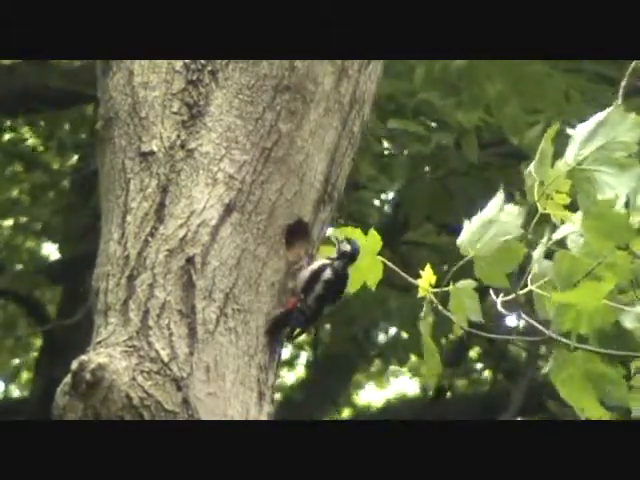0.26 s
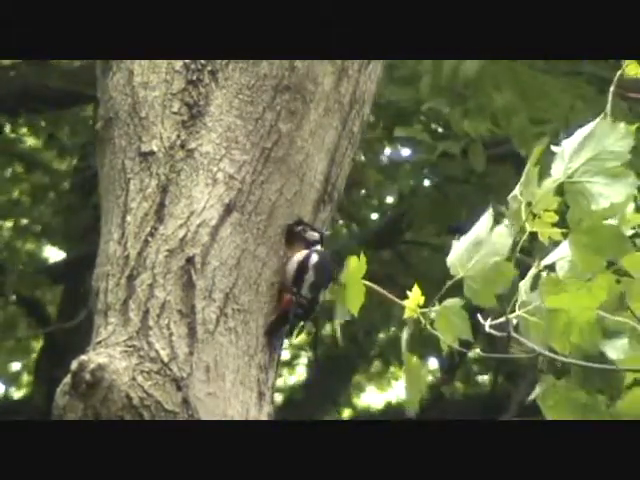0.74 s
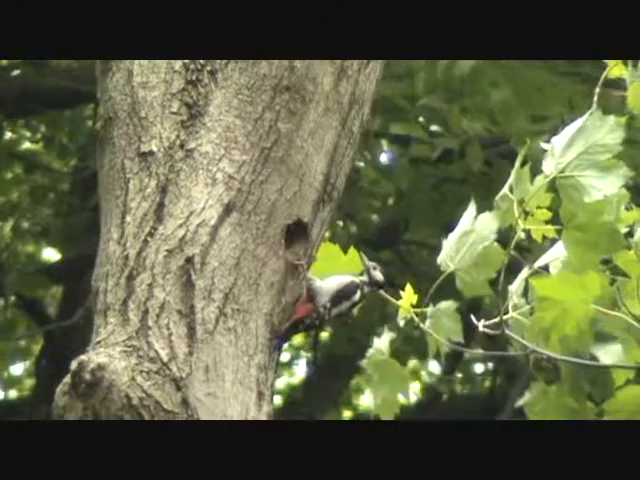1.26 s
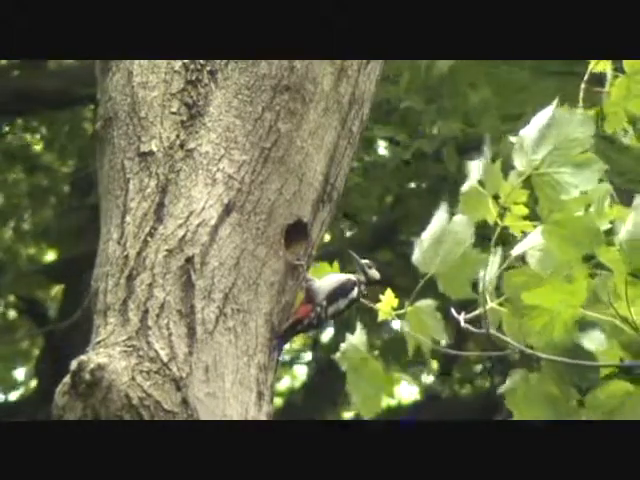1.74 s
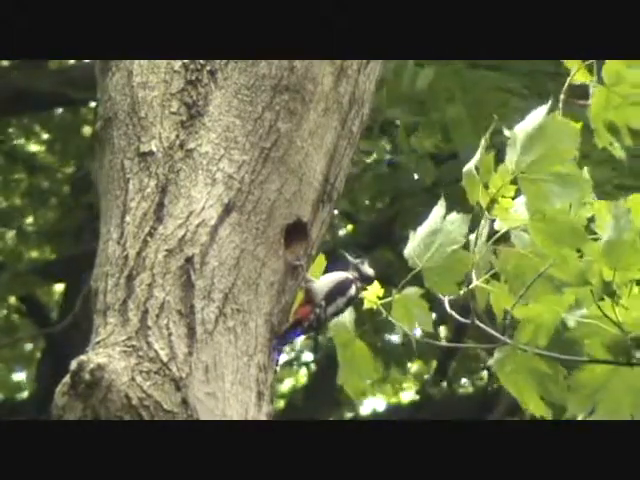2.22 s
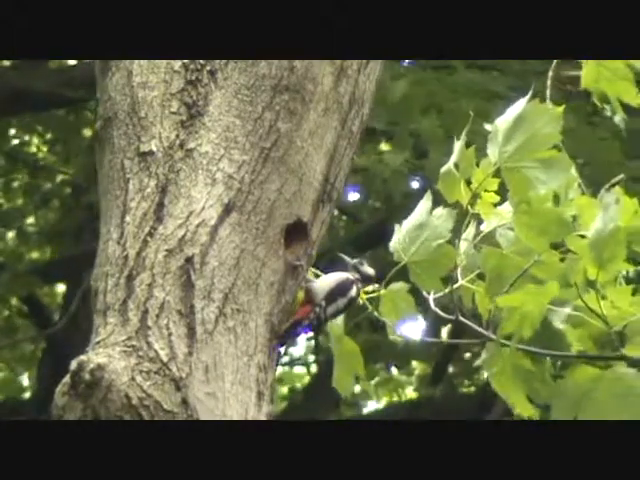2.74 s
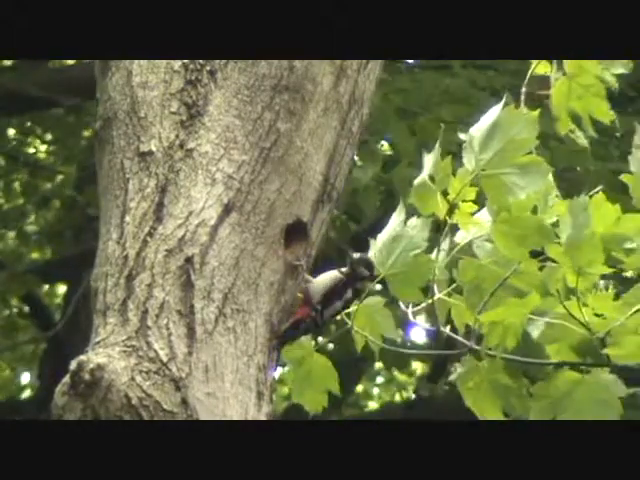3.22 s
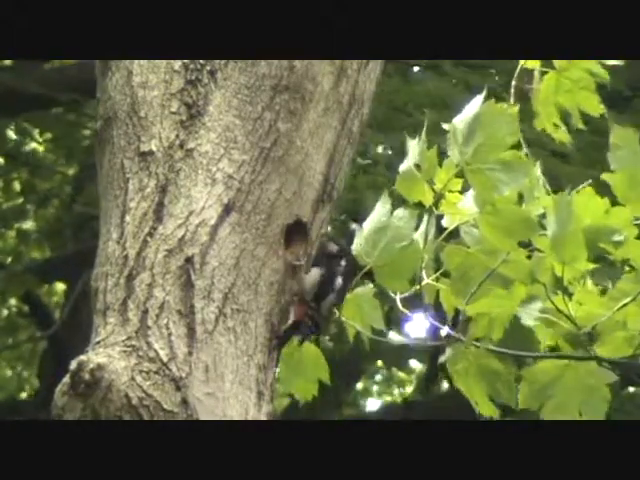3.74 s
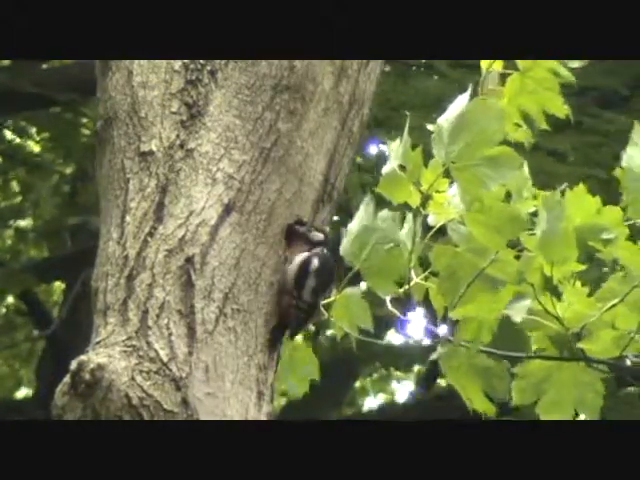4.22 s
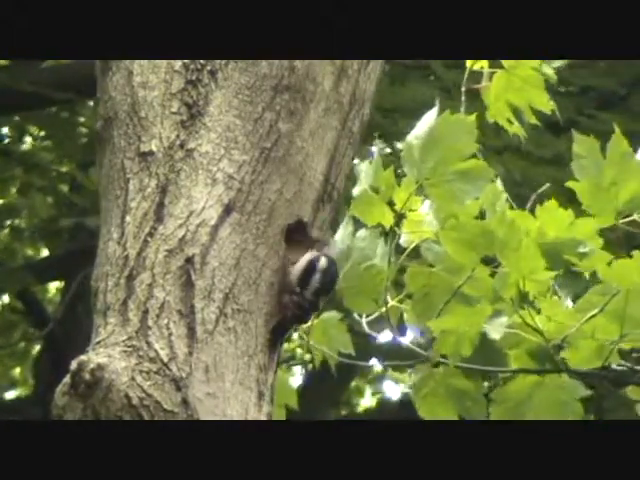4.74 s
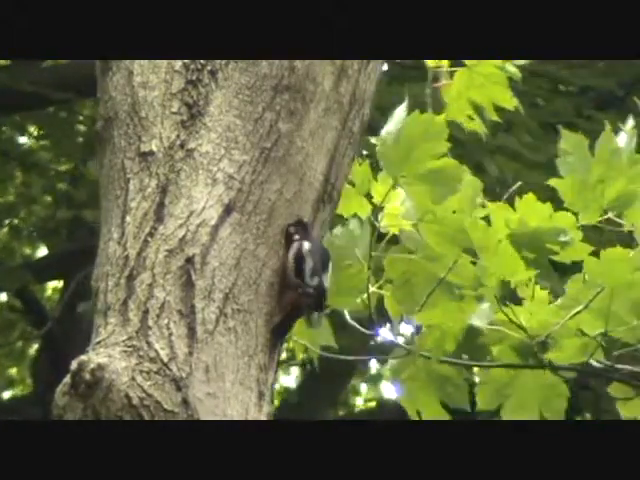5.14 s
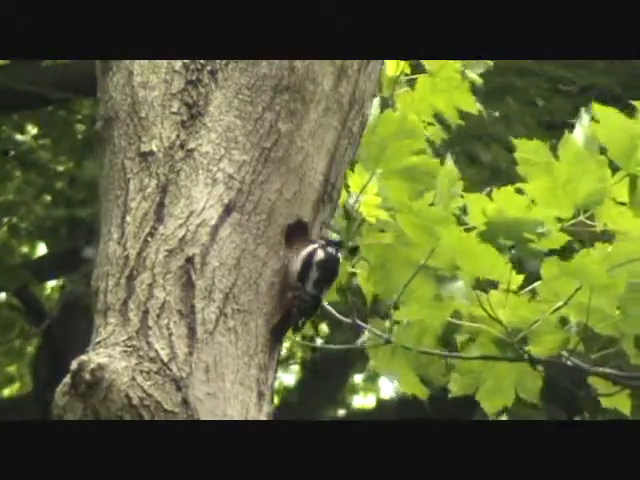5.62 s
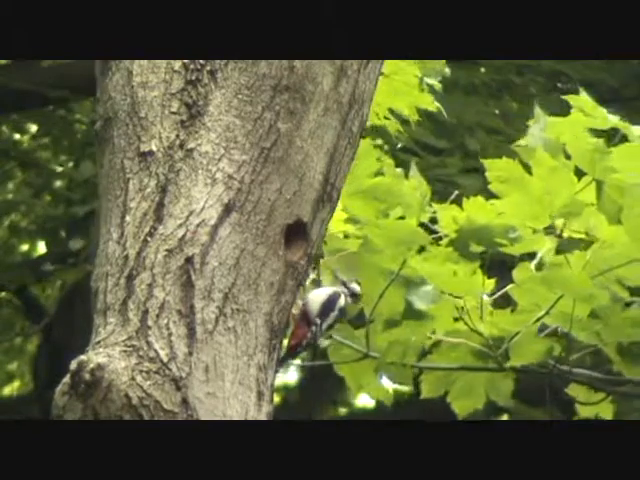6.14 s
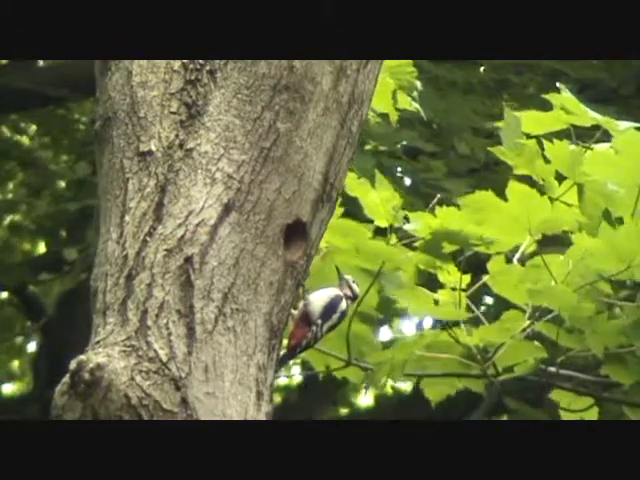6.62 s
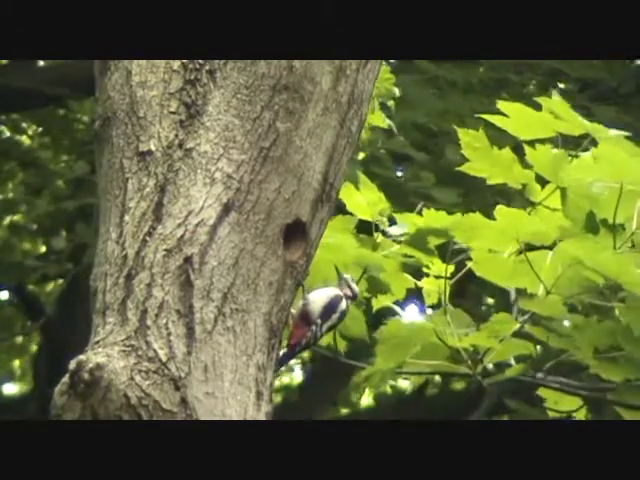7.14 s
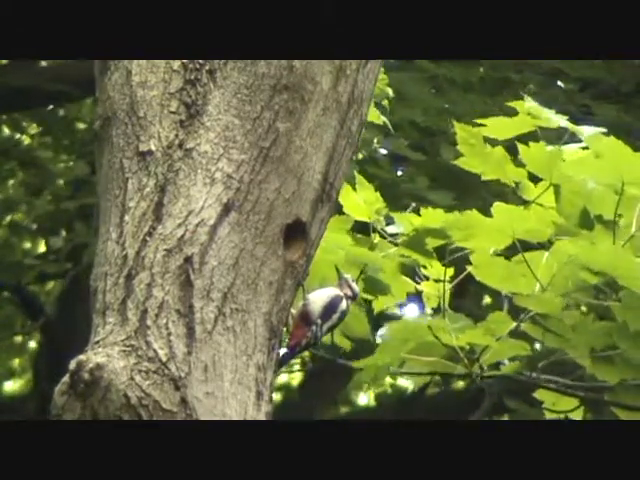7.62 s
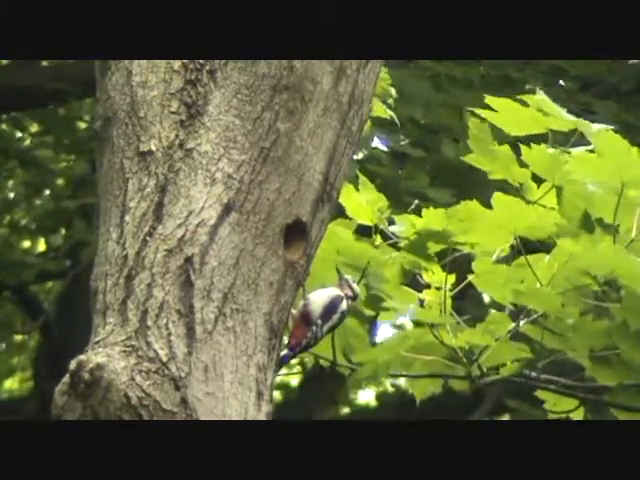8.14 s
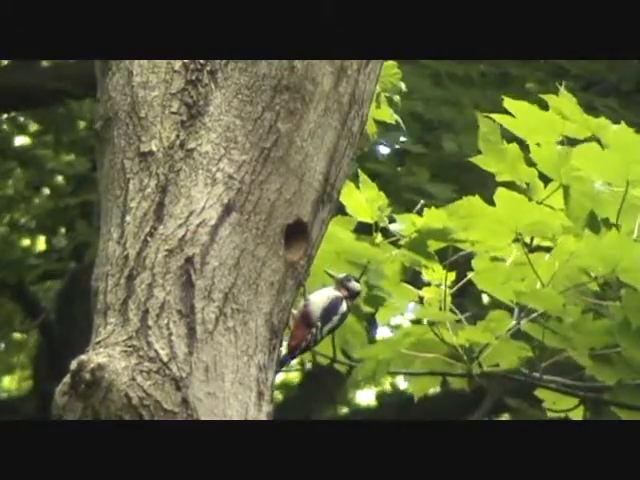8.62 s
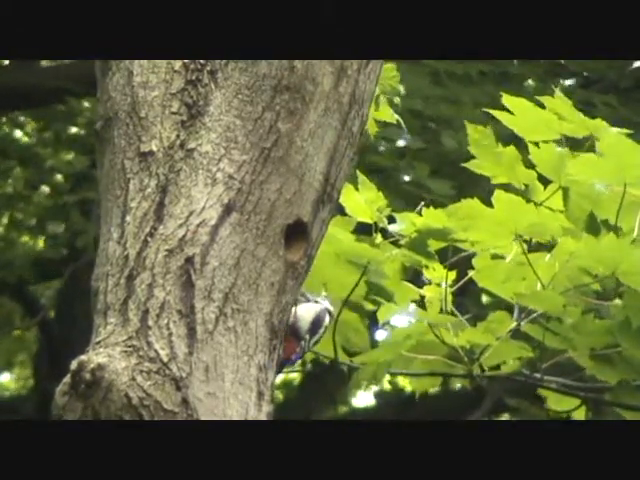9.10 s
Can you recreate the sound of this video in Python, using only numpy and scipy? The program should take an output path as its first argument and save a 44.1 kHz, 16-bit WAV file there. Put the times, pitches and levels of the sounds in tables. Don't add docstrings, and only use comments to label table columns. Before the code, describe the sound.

In leafy woodland, a rapid woodpecker chatter dies away, small birds chip and whistle, then two crisp lone calls ring out above low wind.

```python
import sys
import numpy as np
from scipy import signal
from scipy.fft import rfft, irfft, next_fast_len
from scipy.io import wavfile
from scipy.ndimage import uniform_filter1d

SR = 44100
rng = np.random.default_rng(int(sys.argv[2]) if len(sys.argv) > 2 else 0)


def transcribe(u):
    v = np.clip(np.atleast_2d(u).T, -1, 1)
    q = np.round(v * 32767).astype(np.int16)
    wavfile.write(sys.argv[1], SR, q)


def undo_db(level):
    steps = np.asarray(level, float) / 20
    return 10 ** steps


N = 413216
T = np.arange(N) / SR


def on_curve(rows, at):
    first, *columns = np.transpose(rows)
    return [np.interp(at, first, column) for column in columns]


def at_hz(points, hz):
    return on_curve([(np.log(f), db) for f, db in points], np.log(hz))[0]


def drift(rate_hz):
    points = rng.standard_normal(int(N / SR * rate_hz * 4) + 8)
    slow = uniform_filter1d(points, size=3) * np.sqrt(3)
    return np.interp(T * rate_hz * 4, np.arange(len(slow)), slow)


def swells(rows):
    return sum(undo_db(db) * np.exp(-((T - middle) / half) ** 2) for middle, half, db in rows)


# f/Hz, side minus mid level/dB
WIDTH = [(60, -8), (150, -22.5), (380, -15.5), (950, -6.5), (2380, -3), (5980, -4.5), (15000, -8)]


def noise(spectrum, patchy_db, side_db=0):
    size = next_fast_len(N)
    hz = np.arange(size // 2 + 1) * SR / size + 1e-3
    inside = (hz > spectrum[0][0]) * (hz < spectrum[-1][0])
    gain = undo_db(at_hz(spectrum, hz)) * inside
    white = rfft(rng.standard_normal((2, size)))
    balance = np.array([np.ones_like(hz), undo_db(side_db + at_hz(WIDTH, hz))])
    mid, side = irfft(white * gain * balance, size)[:, :N]
    return np.array([mid + side, mid - side]) / mid.std() * undo_db(patchy_db * drift(5.5))


# t/s, steady stream level/dB, eddies level/dB
BREEZE = [(0, -39, -45.5), (.45, -43.5, -51.5), (.9, -45.5, -55), (2.9, -44.5, -52.5), (3.9, -45, -54.5),
          (4.45, -47, -53.5), (5.32, -51.5, -41), (5.65, -44, -49.5), (6.5, -47.5, -52.5),
          (8.2, -46, -51.5), (8.8, -43.5, -49.5), (9.37, -45, -49)]
# f/Hz, level/dB per Hz
RUMBLE = [(12, -42), (20, -5), (39, -9.5), (59, 2), (130, -8.5), (170, -43), (290, -120)]
# f/Hz, level/dB per Hz
BUFFET = [(59, -52), (100, -47), (125, 0), (188, 1), (340, -6), (440, -14), (750, -120)]


def port_wind():
    rumble_db, buffet_db = on_curve(BREEZE, T)
    ports = undo_db([[.3], [-.3]])
    rumble = undo_db(rumble_db) * noise(RUMBLE, 0.39, side_db=-8)
    buffet = undo_db(buffet_db + 0.5) * noise(BUFFET, 0.64, side_db=5)
    return ports * (rumble + buffet)


# middle t/s, half length/s, level/dB
HUM_SWELLS = [
    (0, .2, -49),
    (1.2, .25, -48),
    (2.5, .55, -41),
    (3.95, .18, -41),
    (5.3, .35, -36),
    (8.85, .35, -49),
]
# f/Hz, level/dB per Hz
HUM = [(300, -20.5), (350, -5), (385, 1.5), (420, -5.5), (480, -88)]


def cavity_hum():
    rest_db = -54
    return undo_db(-4) * (undo_db(rest_db) + swells(HUM_SWELLS)) * noise(HUM, 1, side_db=-6)


# f/Hz, level/dB per Hz
FAR_AIR = [(150, -64), (250, -8.5), (304, -11.5), (398, -1.5), (455, -2.5), (830, -5), (1560, -15.5),
           (2010, -16.5), (2200, -20.5), (3550, -26.5), (9000, -34), (11700, -44), (19800, -120)]


def far_air():
    return undo_db(-44 - 1.6) * noise(FAR_AIR, 0.1)


# t/s, level/dB
LEAVES = [(0, -61), (.9, -63.5), (1.3, -66), (2.2, -63), (5.4, -67.5), (6.5, -64), (9.37, -65)]
# f/Hz, level/dB per Hz
HISS = [(4120, -5), (7000, -4.5), (7770, -7.5), (8210, -12), (16000, -14)]


def leaf_hiss():
    return undo_db(on_curve(LEAVES, T)[0] + 2.5) * noise(HISS, 0.19)


# middle t/s, half length/s, level/dB
GUSTS = [(.15, .3, -33), (.75, .08, -35), (1.85, .07, -40), (2.6, .1, -36), (3.28, .06, -43),
         (3.72, .12, -39), (4.18, .13, -37), (5.13, .15, -42), (5.75, .3, -35), (7.12, .12, -39),
         (7.45, .1, -38), (8.3, .2, -41), (8.95, .1, -49), (9.27, .07, -37)]
# f/Hz, level/dB per Hz
GUST_COLOUR = [(20, 14.5), (50, -4), (90, 4), (200, -20.5), (310, -22), (600, -34)]


def port_gusts():
    return undo_db(1.5) * swells(GUSTS) * noise(GUST_COLOUR, 2.5)[0] * [[1.12], [-.88]]


# t/s, level/dB, f/Hz
THUMPS = [
    (0.139, -25, 95),
    (0.295, -26, 101),
    (1.781, -26.5, 248.3),
]


def port_thumps():
    out = np.zeros(N)
    for s, db, hz in THUMPS:
        pulse = np.exp(-((T - s) * hz / 0.34) ** 2)
        out += undo_db(db) * pulse * np.sin(2 * np.pi * hz * (T - s))
    return out


# t/s, level/dB
CHORUS = [(0, -47), (.6, -59), (3.1, -56.5), (3.6, -52), (4.4, -46.5), (5, -50.5), (5.7, -55.5), (6.3, -56),
          (7.3, -51.5), (8.3, -52), (9.37, -50)]
# f/Hz, level/dB per Hz
BLUR = [(1500, -36), (2300, 0), (3500, 4.5), (5000, -0.5), (6500, -10), (8500, -47)]


def far_chorus():
    return undo_db(on_curve(CHORUS, T)[0] - 4) * noise(BLUR, 2)


def wood(x, t60, side_db):
    t = np.arange(int(.8 * SR)) / SR
    shape = undo_db(-60 * t / t60) * np.clip(t / .02, 0, 1)
    tails = rng.standard_normal((2, len(t))) * shape / np.sqrt(np.sum(shape ** 2))
    mid, side = signal.fftconvolve(x[None], tails, axes=1)[:, :N]
    return np.array([mid + undo_db(side_db) * side, mid - undo_db(side_db) * side])


def bark(sound):
    delay_s, spread_s, decay_s = 0.01, 0.011, 0.05
    t = np.arange(int(.12 * SR)) / SR
    shape = np.exp(-((t - delay_s) / spread_s) ** 2)
    shape += .5 * np.exp(-t / decay_s) + 0.2 * np.exp(-t / 0.0055)
    grains = rng.standard_normal(len(t)) * shape / np.sqrt(np.sum(shape ** 2))
    return signal.fftconvolve(sound, grains)


def whistle(curves, fade_hz, steady):
    out = np.zeros(N)
    fading = steady + .5 * drift(fade_hz) + .5j * drift(fade_hz)
    for rows in curves:
        start, end = rows[0][0], rows[-1][0]
        span = slice(round(start * SR), round(end * SR))
        t = T[span]
        hz, db = on_curve(rows, t)
        edge = np.clip(np.minimum(t - start, end - t) / 0.0025, 0, 1)
        tone = np.exp(2j * np.pi * np.cumsum(hz) / SR)
        out[span] += undo_db(db) * edge * np.real(fading[span] * tone)
    return out


def glides(rows, bend):
    return [[(s, hz0, db - 0.5),
             (s + .5 * long, bend * hz0 + (1 - bend) * hz1, db),
             (s + long, hz1, db + 1)] for s, long, hz0, hz1, db in rows]


# t/s, length/s, from f/Hz, to f/Hz, peak level/dB
WHISTLES = [(.53, .09, 2250, 2020, -51), (.6, .12, 2000, 2080, -44), (6.33, .2, 1800, 2270, -48),
            (6.52, .07, 2200, 2120, -45), (6.57, .15, 2180, 2200, -54), (6.77, .13, 1930, 2080, -44),
            (6.87, .1, 2050, 1950, -53), (7.1, .17, 2600, 2720, -48), (7.2, .14, 2800, 2980, -57),
            (7.28, .09, 2350, 2130, -55), (8.52, .1, 2400, 2170, -56), (9.27, .1, 3300, 2780, -58),
            (.3, .1, 2150, 1950, -59), (8.9, .2, 2780, 2720, -60), (.2, .12, 2950, 2680, -54),
            (0, .46, 3200, 3310, -49), (.465, .26, 2850, 3230, -48), (5.76, .14, 3610, 3400, -60),
                 (8.81, .29, 3600, 3530, -54), (8.72, .08, 3180, 3130, -54), (7.86, .19, 5300, 5080, -58),
                 (6.67, .1, 4800, 5250, -53), (6.74, .16, 5150, 4450, -51), (6.26, .21, 5300, 4450, -53),
                 (4.65, .2, 4360, 4300, -52), (7.28, .25, 3800, 3900, -55), (7.57, .2, 3200, 3740, -53),
                 (7.73, .28, 3760, 3890, -48), (9.21, .16, 4060, 4000, -51), (3.1, .2, 7637, 7450, -58),
                 (7.26, .21, 8250, 7400, -61), (8.54, .19, 8000, 7520, -62), (8.49, .08, 8150, 8130, -61),
                 (7.6, .17, 4680, 4640, -61), (8.5, .12, 5200, 4900, -63), (8.41, .08, 4050, 4000, -60),
                 (.67, .05, 3980, 3950, -58)]
# t/s, period/s, first f/Hz, last f/Hz, level/dB
TRILLS = [
    (3.36, .147, 3900, 3800, -55),
    (3.862, .082, 3620, 3520, -51),
]


def far_whistles():
    slide_share, swell_db, fade_db = .4, -7, -11
    curves = [[(s, hz0, db + swell_db), (s + slide_share * long, hz1, db), (s + long, hz1, db + fade_db)]
              for s, long, hz0, hz1, db in WHISTLES]
    sung_share = 0.71
    trills = []
    for (s, period, hz0, hz1, db), count in zip(TRILLS, (3, 6)):
        for k, hz in enumerate(np.linspace(hz0, hz1, count)):
            trills.append((s + k * period, sung_share * period, 1.01 * hz, hz, db))
    return undo_db(7.5) * whistle(curves + glides(trills, 0.35), fade_hz=69.8, steady=0.19)


# t/s, length/s, from f/Hz, to f/Hz, level/dB
STRANDS = [(6.26, .21, 5250, 5100, -58), (6.29, .18, 4600, 4400, -54), (6.76, .27, 4600, 4500, -55),
           (6.7, .32, 5350, 5250, -57), (6.8, .2, 4850, 4800, -58), (6.55, .12, 6200, 6700, -64),
           (6.56, .1, 5500, 5400, -60), (6.58, .1, 6600, 6100, -64), (.88, .05, 2850, 2800, -52),
           (6.62, .08, 2900, 3200, -59), (.12, .2, 3100, 2600, -56), (4.6, .08, 6100, 6900, -66),
           (7.28, .2, 4150, 4000, -56), (9.22, .1, 4400, 4150, -60), (5.0, .1, 5500, 5600, -64),
           (4.24, .06, 2800, 2900, -58), (2.58, .06, 8700, 8300, -64), (5.17, .19, 4000, 4000, -63),
           (5.22, .14, 4800, 4700, -64), (.1, .4, 5250, 5200, -59), (7.11, .26, 5300, 5150, -59),
           (6.78, .25, 5100, 5050, -55), (7.29, .2, 3750, 3800, -58), (7.62, .3, 3300, 3300, -60),
           (7.75, .3, 4000, 3950, -58), (6.42, .06, 5600, 5700, -59)]


def fluttering_strands():
    return undo_db(5.5) * whistle(glides(STRANDS, 0.41), fade_hz=183.7, steady=0.037)


# t/s, length/s, from f/Hz, to f/Hz, level/dB
CHIPS = [(3.20, .04, 3800, 4000, -58), (3.735, .05, 4650, 4450, -53), (4.302, .035, 4400, 2700, -45),
         (4.31, .03, 6300, 3800, -52), (4.375, .03, 3500, 5000, -51), (4.39, .065, 4500, 3500, -49),
         (4.44, .04, 4000, 2500, -49), (4.63, .03, 5000, 4200, -56), (4.715, .03, 5500, 4200, -53),
         (4.745, .06, 4800, 2900, -50), (4.80, .07, 3700, 2500, -52), (4.9, .09, 3400, 2600, -57),
         (4.98, .06, 5900, 3700, -61), (5.09, .035, 5700, 3700, -57), (5.41, .09, 3900, 2100, -59),
         (8.14, .04, 4800, 4300, -60), (8.47, .06, 4200, 2700, -59), (6.92, .12, 1750, 1680, -55),
         (4.81, .03, 5200, 4400, -57), (5.38, .05, 3300, 4400, -59)]
# t/s, period/s, from f/Hz, to f/Hz, level/dB
CHIP_RUNS = [
    (3.29, .15, 4550, 4000, -53),
    (3.845, .081, 5300, 4000, -53),
]


def warbler_chips():
    chip_s = .033
    runs = [(s + k * period, chip_s, *rest)
            for (s, period, *rest), count in zip(CHIP_RUNS, (3, 5)) for k in range(count)]
    return whistle(glides(CHIPS + runs, 0.46), fade_hz=150.3, steady=0.8)


def songbirds():
    whistles = far_whistles() + fluttering_strands()
    chips = warbler_chips()
    scatter = wood(undo_db(-4) * whistles, .6, side_db=-8) + wood(undo_db(6) * chips, .5, side_db=-8)
    return whistles + undo_db(2.5) * chips + undo_db(-.5) * bark(chips)[:N] + scatter


# f/Hz, level/dB
BILL = [(900, -14.5), (1300, -13.5), (2300, -5.5), (3500, -0.5), (5300, -11.5), (6500, -21.5), (7600, -27),
        (8800, -39.5), (11500, -42), (16000, -51)]
LOW_PARTIALS_DB = [5, 7.5, -6, -8.5, -2, -15, -30, -21, -16, -13.5, -20, -12]
# f/Hz, level/dB
FORWARD = [(1200, 2.5), (2300, -1), (3000, 5.5), (3800, 5.5), (4600, 9), (5400, 0), (6900, 10.5),
           (11500, 19)]


def note(row, stance, low_pitch, arch_pitch, arch_level, rough, breath_db, swell_db, low_throat):
    _, low_ms, arch_ms, top_hz, db = row
    throat_hz, first_db, top_db, trunk_db, _, low_db, air_db = stance
    ms = np.arange(int((low_ms + 1.5 * arch_ms) * SR / 1000)) * 1000 / SR
    part = (ms - low_ms) / arch_ms
    low = part < 0

    hz = top_hz * np.where(low, on_curve(low_pitch, ms / low_ms)[0], on_curve(arch_pitch, part)[0])
    low_level = low_db + swell_db * (ms / low_ms - .5)
    level = db + np.where(low, low_level, on_curve(arch_level, part)[0])
    level = undo_db(uniform_filter1d(level, size=90)) * np.clip(ms / 0.44, 0, 1)

    wobble = uniform_filter1d(rng.standard_normal((13, 4000)), size=40)
    wobble = uniform_filter1d(wobble, size=30)[:, :len(ms)] * 7.5
    unsteady = rough * np.where(abs(part - .5) > .45, 4.5, 1)
    phase = 2 * np.pi * np.cumsum(uniform_filter1d(hz, size=40) * (1 + unsteady * wobble[0])) / SR
    k = np.arange(1, 13)[:, None]
    partial_hz = k * hz

    throat_db, throat_width_hz = 8.5, 550
    throat = throat_db / (1 + ((partial_hz - throat_hz) / throat_width_hz) ** 2)
    throat = uniform_filter1d(throat * np.where(low, low_throat, part < .95), size=60)
    shimmer_db = .4 + np.clip((trunk_db + 20) / 6, 0, 3)
    colour = at_hz(BILL, partial_hz) + np.where(low | (part > .95), np.c_[LOW_PARTIALS_DB], 0)
    colour = uniform_filter1d(colour + shimmer_db * wobble[1:], size=60)
    partials = undo_db(colour) * (partial_hz < 16500) * np.sin(k * phase)

    broken_db = 1.5 * shimmer_db * np.clip(k - 2, 0, 2) * np.minimum(wobble[1:], .3)
    beam_db = first_db * (k == 1) + top_db * np.clip((partial_hz - 4800) / 1500, 0, 1)
    here = np.sum(partials * undo_db(throat + broken_db + beam_db), axis=0)
    shut_bill_db = -8 * (k > 3) * low
    thrown = np.sum(partials * undo_db(at_hz(FORWARD, partial_hz) + shut_bill_db), axis=0)

    band = signal.butter(4, [2200, 6200], "band", fs=SR, output="sos")
    breath = signal.sosfilt(band, rng.standard_normal(4000))
    breath += undo_db(air_db) * signal.lfilter([1, -1], [1, -1.1, .45], rng.standard_normal(4000))
    leak_db = breath_db * np.clip((abs(part - .5) - .5) / 0.04, 0, 1) - 22.5
    return level * (np.array([here, thrown]) + undo_db(leak_db) * breath[:len(ms)])


def place_calls(rows, stance_at, **voice):
    here, thrown = np.zeros((2, N))
    for row in rows:
        stance = stance_at(row[0])
        trunk_db, trees_db = stance[3:5]
        direct, forward = note(row, stance, **voice)
        echo = undo_db(trunk_db) * bark(forward)
        at = round(row[0] * SR)
        here[at:at + len(direct)] += direct
        here[at:at + len(echo)] += echo
        thrown[at:at + len(direct)] += forward * undo_db(trees_db)
    return np.array([here, thrown])


# t/s, turned away/0-1, bill hidden by the trunk/0-1, throat resonance f/Hz
POSTURE = [
    (.72, 0.01, 0.08, 3624),
    (.94, 0.08, 0.1, 4100),
    (1.06, 0.15, 0.11, 4450),
    (1.54, 0.41, 0, 4130),
    (1.76, 0.64, 0.04, 4200),
    (1.87, 0.64, 0.99, 3300),
    (2.1, 0.65, 1.05, 3680),
    (2.6, 0.81, 0.4, 3600),
    (2.8, 0.92, 0.5, 3920),
]


def pose(s):
    turn, hidden, throat_hz = on_curve(POSTURE, s)
    first = -4.5 + 12.5 * turn
    top = 4.5 - 2 * turn - 48 * hidden
    trunk = -17 + 19.5 * turn
    trees = -18.5 + 12 * turn
    low = -13.5 + 4 * turn + 3 * hidden
    air = -15 + 18 * turn - 36 * hidden
    return throat_hz, first, top, trunk, trees, low, air


# t/s, low part/ms, arch/ms, arch top f/Hz, arch level/dB
CHATTER = [(.724, 20.5, 29.5, 2313, -11.5), (.939, 22.4, 29, 2324, -12.5), (1.058, 28.3, 20.6, 2272, -11.5),
           (1.177, 24.1, 28.5, 2338, -14.5), (1.292, 23.5, 30.5, 2265, -17.5),
           (1.422, 24.8, 29.6, 2248, -19), (1.540, 25.5, 22.8, 2217, -17), (1.656, 26.4, 31, 2230, -21),
           (1.763, 26, 26.7, 2270, -22.5), (1.870, 23.6, 23.6, 2194, -25.5), (1.983, 28.8, 23.5, 2072, -28),
           (2.106, 27, 26, 2282, -27), (2.228, 26.7, 31.7, 2293, -28), (2.343, 27.6, 26.5, 2295, -27.5),
           (2.480, 23.6, 30.8, 2275, -28.5), (2.629, 26.5, 28, 2340, -27.5), (2.803, 18.6, 33, 2430, -29)]
CHATTER_LOW = [(0, .69), (.12, 0.67), (0.25, .5), (.6, .505), (1.001, 0.54)]
CHATTER_ARCH = [(0, .55), (.08, .84), (.18, .95), (.4, 1.0), (.58, 0.94), (.72, 0.86), (.84, .72),
                (.94, 0.48), (1.151, 0.46)]
# share of the arch/0-1, level/dB
CHATTER_ARCH_DB = [(0, -5), (0.082, 0), (.5, -0.5), (.8, -0.5), (.95, -8), (1.08, -20), (1.3, -38),
                   (1.48, -51)]


def chatter():
    return place_calls(CHATTER, pose, low_pitch=CHATTER_LOW, arch_pitch=CHATTER_ARCH,
                       arch_level=CHATTER_ARCH_DB, rough=.008, breath_db=13.5, swell_db=1, low_throat=.6)


# t/s, low part/ms, arch/ms, arch top f/Hz, arch level/dB
SINGLES = [
    (6.476, 13, 37.4, 2708, -14),
    (7.037, 13.2, 35, 2714, -10.5),
]
SINGLE_LOW = [(0, .55), (.4, .48), (1, .51)]
SINGLE_ARCH = [(0, 0.51), (.05, .84), (.12, 0.94), (.3, 1.0), (.58, 0.92), (.75, .88), (.85, .69),
               (0.951, .5), (1.2, .46)]
# share of the arch/0-1, level/dB
SINGLE_ARCH_DB = [(0, 1), (.07, 5), (.4, 4.5), (.7, -3), (.83, 2.5), (.97, -10), (1.2, -25), (1.35, -31)]


def single_calls():
    stance = 5300, -7, -1, -28, -28, -21, -38
    return place_calls(SINGLES, lambda s: stance, low_pitch=SINGLE_LOW, arch_pitch=SINGLE_ARCH,
                       arch_level=SINGLE_ARCH_DB, rough=.006, breath_db=27, swell_db=10, low_throat=1.3)


def woodpecker():
    here, thrown = chatter() + single_calls()
    return here + wood(thrown, t60=0.83, side_db=-51)


def scene():
    breeze = port_wind() + cavity_hum() + far_air() + leaf_hiss() + port_gusts() + port_thumps()
    return breeze + far_chorus() + songbirds() + woodpecker()


def low_pass(x):
    return signal.sosfilt(signal.butter(12, 16290, fs=SR, output="sos"), x)


def record(dry):
    mix = signal.sosfilt(signal.cheby2(18, 60, 16450, fs=SR, output="sos"), dry)
    return low_pass(mix)


dry = scene()
out = record(dry)
transcribe(out)
```